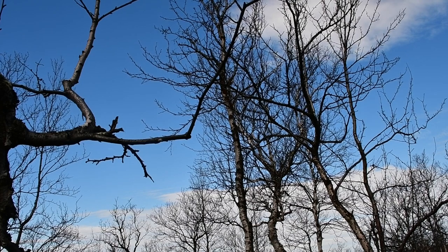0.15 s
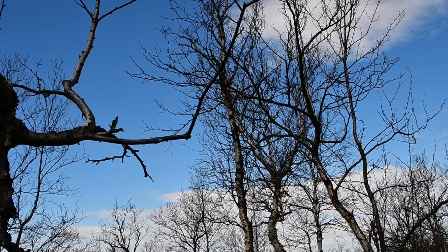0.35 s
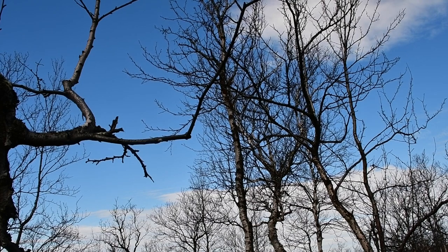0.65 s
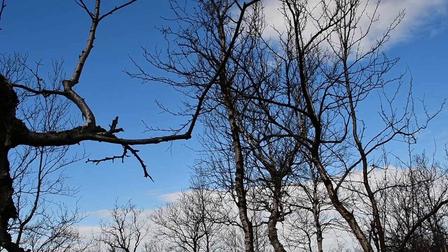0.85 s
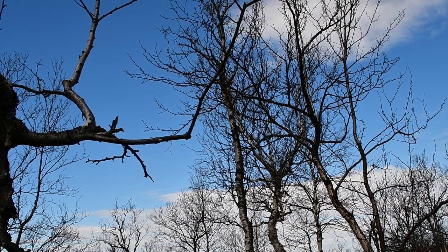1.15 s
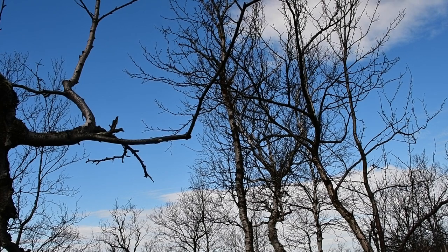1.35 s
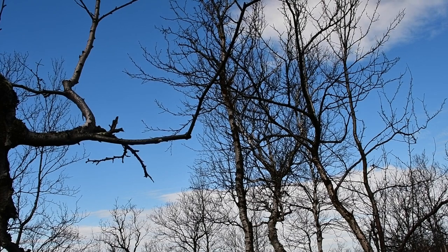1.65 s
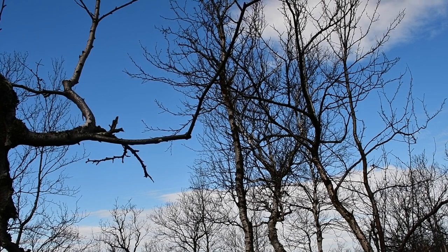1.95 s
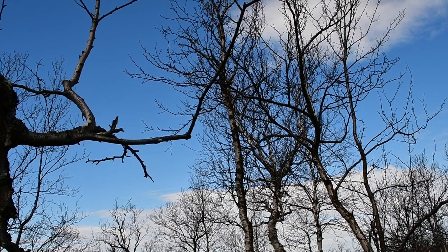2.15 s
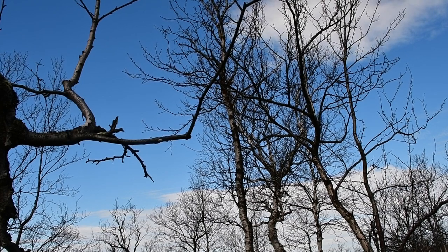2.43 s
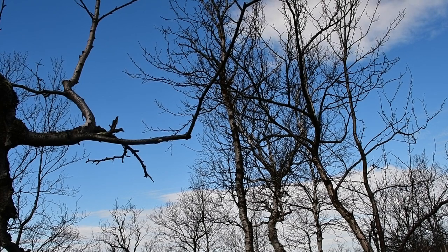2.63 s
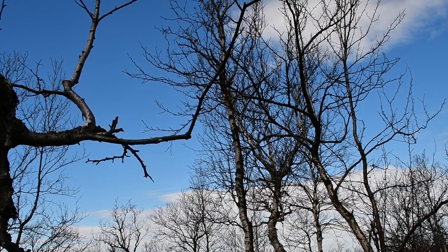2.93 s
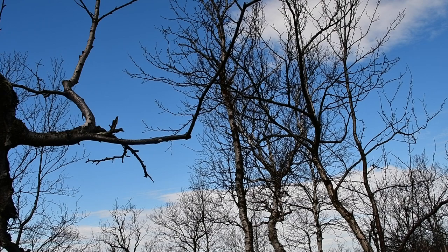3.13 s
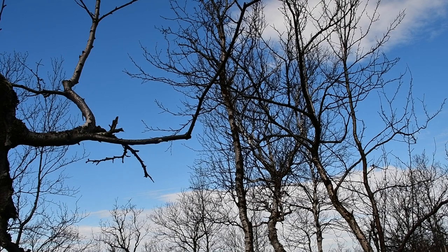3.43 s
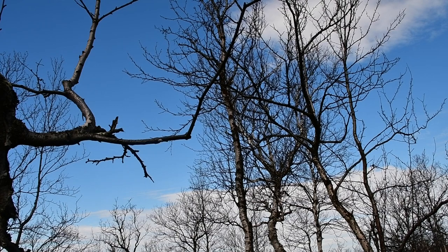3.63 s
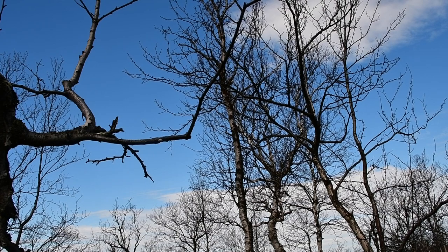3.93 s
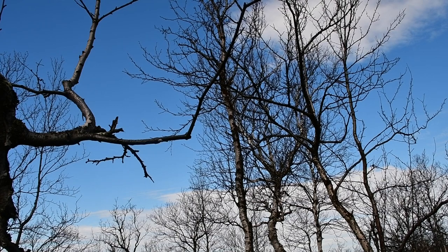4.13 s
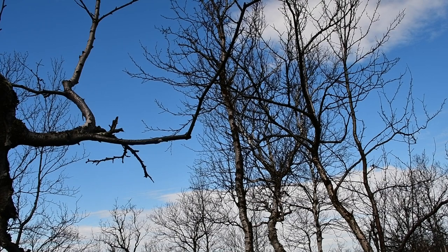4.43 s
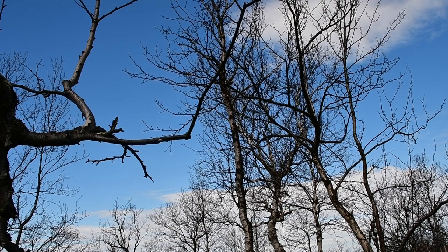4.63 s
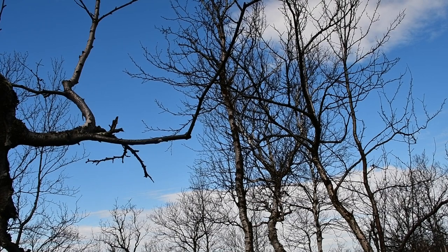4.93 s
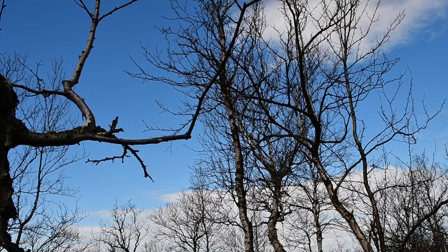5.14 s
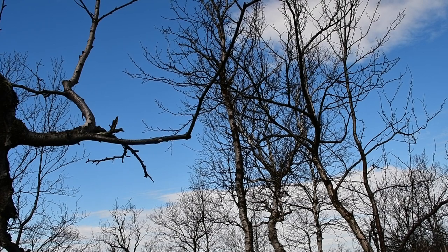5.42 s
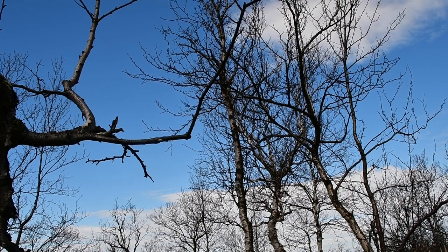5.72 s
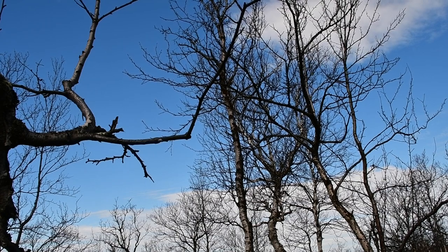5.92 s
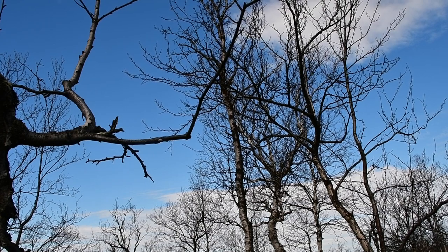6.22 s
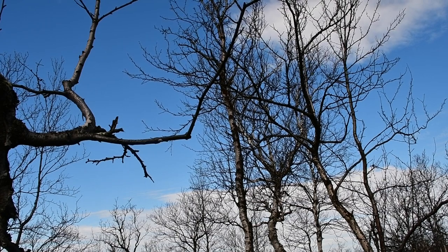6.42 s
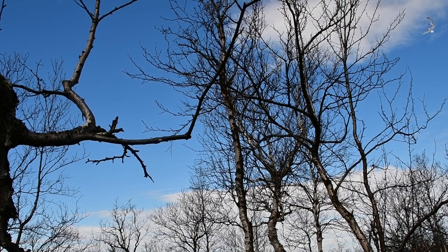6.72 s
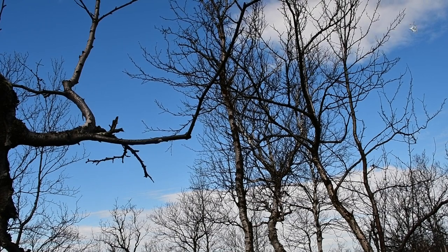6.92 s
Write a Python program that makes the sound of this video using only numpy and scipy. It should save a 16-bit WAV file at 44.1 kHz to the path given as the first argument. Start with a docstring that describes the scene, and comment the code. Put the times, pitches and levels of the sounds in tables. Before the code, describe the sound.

A quiet open-air stereo scene with air hiss, distant low engine hum and slight wind rumble at the microphone. Far gulls call singly, their falling cries scattered by trunks into a long thin tail. Songbirds whistle and slur throughout, with a few dry ticks. Later comes a buzzy mew, a run of chirps, and finally the strongest, closest gull cry with mewing answers, weighted right.

```python
"""Gulls call over the edge of a bare wood, on stereo with the right side louder, in air, engine hum and wind.
Three high cries come close together, then two more; each is a rough catch, a top pitch and a sag to a break.
Small birds whistle and slur throughout as thin bending notes; one starts a repeated phrase, dry ticks join in.
A long nasal mew follows, rich in partials, then twitter over gusts of low filtered noise.
A near cry overlaps a rising mew, and a softer mew ends; trunks scatter each call into a long noise tail."""
import sys
import numpy as np
from scipy import signal
from scipy.fft import rfft, irfft
from scipy.io import wavfile
from scipy.ndimage import map_coordinates

SR = 44100
rng = np.random.default_rng(int(sys.argv[2]) if len(sys.argv) > 2 else 0)


def transcribe(signal):
    """Save signal, clipped to [-1, 1], as a 16-bit WAV file at the path in sys.argv[1]."""
    frames = np.atleast_2d(signal).T
    limited = np.clip(frames, -1, 1)
    pcm = np.round(limited * 32767).astype(np.int16)
    wavfile.write(sys.argv[1], SR, pcm)


N = 311787
TIME = np.arange(N) / SR


def undb(db):
    """Decibels to gain."""
    return 10 ** (np.asarray(db) / 20)


def unit(x):
    """Scale to rms 1."""
    return x / np.sqrt(np.mean(x ** 2))


def at_hz(points, hz):
    """Read a (frequency_hz, value) table on a log-frequency axis."""
    f, value = np.transpose(points)
    return np.interp(np.log(np.maximum(hz, 1)), np.log(np.maximum(f, 1)), value)


def colour(x, points):
    """Filter a sound by a (frequency_hz, gain_db) table."""
    size = x.shape[-1]
    gain = undb(at_hz(points, np.fft.rfftfreq(size, 1 / SR)))
    return irfft(rfft(x) * gain, size)


def walk(rate_hz, size=N):
    """Smooth random curve through normal draws of spread 1, rate_hz of them a second."""
    knots = rng.standard_normal(int(size * rate_hz / SR) + 2)
    return map_coordinates(knots, [np.arange(size) * rate_hz / SR], order=3, mode="nearest")


def bump(t, centre_s, half_width_s):
    """Bell curve of height 1 around a moment."""
    return np.exp(-((t - centre_s) / half_width_s) ** 2)


def add(track, start_s, sound):
    """Mix a sound into a track at a time."""
    i = int(start_s * SR)
    track[i:i + len(sound)] += sound[:max(N - i, 0)]


def late(x, lag_s):
    """The same sound, arriving later."""
    return np.interp(TIME - lag_s, TIME, x)


# hiss spectrum, relative: [frequency_hz, density_db]
AIR_COLOUR = [(120, -7), (200, -2.5), (223, -5.5), (258, -8.5), (399, -8), (1150, -11.5), (1400, -12.5),
              (1540, -12), (3070, -13), (3820, -15.5), (4330, -17), (5200, -17), (7480, -24.5),
              (15500, -21.5)]
# likeness of left and right: [frequency_hz, correlation from -1 to 1]
AIR_LIKENESS = [(300, 1), (640, 0.83), (1400, -0.03), (3100, -0.29), (6800, 0.18), (9500, 1)]


def air(level_db=-40.5):
    """Even outdoor hiss, alike on both sides in the bass and the top, diffuse between."""
    likeness = np.clip(at_hz(AIR_LIKENESS, np.fft.rfftfreq(N, 1 / SR)), -1, 1)
    right, other = rfft(rng.standard_normal((2, N)))
    left = likeness * right + np.sqrt(1 - likeness ** 2) * other
    hiss = irfft(np.array([left, right]), N)
    return unit(colour(hiss, AIR_COLOUR)) * undb(level_db)


# partials of the hum: [multiple of the base pitch, relative level_db]
ENGINE_ORDERS = [(1, -7.5), (2, -1.5), (3, -11), (4, -17)]
# lulls in the hum: [centre_s, half_width_s, depth_db]
LULLS = [(2.1, 0.38, -2.5), (3.8, .35, -17), (5.15, .12, -31)]
ENGINE_HZ, ENGINE_DB = 64.33, -42
HUM_FADE_DB_PER_S = -0.07  # the engine slowly recedes


def engine(fading_db=1.5, drift=0.0027):
    """Low engine orders, each fading in and out on its long way through the air."""
    phase = 2 * np.pi * np.cumsum(ENGINE_HZ * (1 + drift * walk(2.8))) / SR
    hum = np.zeros(N)
    for order, db in ENGINE_ORDERS:
        gain = undb(db + fading_db * walk(3.7))
        hum += gain * np.sin(round(order) * phase + rng.uniform(0, 2 * np.pi))
    lull_db = sum(depth_db * bump(TIME, s, width_s) for s, width_s, depth_db in LULLS)
    recede_db = HUM_FADE_DB_PER_S * (TIME - TIME.mean())
    return np.sqrt(2) * hum * undb(ENGINE_DB + lull_db + recede_db)


# rumble spectrum, relative: [frequency_hz, gain_db]
WIND_COLOUR = [(15, -33), (30, -22), (45, -5.5), (70, 2), (100, -4.5), (150, -10.5), (220, -26.5),
               (400, -29), (900, -42)]
# gusts: [peak_s, half_width_s, level_db before gain_db]
GUSTS = [(.6, 0.35, -47), (2.6, 0.027, -42), (3.16, 0.018, -34.5), (3.97, 0.037, -37.5), (4.21, 0.066, -38),
         (5.48, 0.062, -32.5), (5.69, 0.05, -32.5), (5.91, 0.067, -33.5), (6.78, 0.15, -37.5)]
BREEZE_START_DB, FRESHEN_DB_PER_S = -47, 1.16  # the start level is before gain_db


def wind(gain_db=1):
    """Soft gusts over a slowly freshening breeze, as low noise rumbling at the microphone."""
    power = undb(BREEZE_START_DB + FRESHEN_DB_PER_S * TIME) ** 2
    for s, width_s, db in GUSTS:
        power = power + undb(db) ** 2 * bump(TIME, s, width_s)
    rumble = unit(colour(rng.standard_normal(N), WIND_COLOUR))
    return rumble * np.sqrt(power) * undb(gain_db)


# tone of the scatter: [frequency_hz, gain_db]
WOOD_COLOUR = [(300, -12), (1400, 3), (3000, 1), (5000, 2), (9000, 24)]


def wood(x, t60_s, near_db, near_s, build_s=0.0012):
    """Scatter from the trunks: a quick cluster from the nearest, then a long thin tail."""
    t = TIME[:2 * SR]
    tail = np.exp(-np.log(1000) * t / t60_s)
    cluster = undb(near_db) * np.exp(-t / near_s)
    shape = (1 - np.exp(-t / build_s)) * (tail + cluster)
    response = rng.standard_normal((2, len(t))) * shape / np.sqrt(np.sum(shape ** 2))
    return signal.fftconvolve(x[None], colour(response, WOOD_COLOUR), axes=1)[:, :N]


# left port's shading from a source on the right, before its shade_db: [frequency_hz, gain_db]
PORT_SHADE = [(300, 1), (650, -4.5), (2200, -4.5), (3300, -7), (5000, -3), (9000, -20)]
PORT_LAG_S = 0.00016


def from_right(x, shade_db):
    """A source on the right reaches the left port later and shaded."""
    left = undb(shade_db) * colour(late(x, PORT_LAG_S), PORT_SHADE)
    return np.array([left, x])


# dry ticks and rustles close by: [start_s, decay_s, level_db before gain_db]
TICKS = [(3.2941, 0.00057, -15.5), (3.296, 0.024, -38), (3.317, 0.0066, -35.5), (4.723, 0.008, -37.5),
         (6.005, 0.025, -28), (6.04, 0.0073, -33), (6.849, .001, -30)]
# their tone: [frequency_hz, gain_db]
TICK_COLOUR = [(250, -3), (1000, -8), (2500, -4.5), (3600, 1), (5300, -1.5), (6800, -9), (8800, -4.5),
               (10500, -24), (15000, -32)]


def ticks(gain_db=7.5):
    """Short dry noise bursts; the longer ones are rustles that swell before they die away."""
    track, t = np.zeros(N), TIME[:SR // 10]
    for s, decay_s, db in TICKS:
        shape = 2 * (1 - np.exp(-2 * t / decay_s)) * np.exp(-t / decay_s)
        add(track, s, undb(db + gain_db) * shape * rng.standard_normal(len(t)))
    return colour(track, TICK_COLOUR)


def note(length_s, pitches_hz, db, buzz=0.018):
    """A thin sine note that bends smoothly through two or three pitches; buzz jitters the pitch."""
    u = np.linspace(0, 1, max(int(length_s * SR), 2))
    bend = np.polyfit(np.linspace(0, 1, len(pitches_hz)), pitches_hz, len(pitches_hz) - 1)
    hz = np.polyval(bend, u) * (1 + buzz * walk(584, len(u)))
    swell = np.sqrt(2 * np.abs(np.sin(np.pi * u)))
    return undb(db) * swell * np.sin(2 * np.pi * np.cumsum(hz) / SR)


# All songbird levels are before the gain_db of the whole group.
# one phrase: [after_main_note_s, length_s, start_hz, middle_hz, end_hz, level_db re phrase]
PHRASE = [(-.155, 0.0417, 3766, 3940, 3950, -12), (0, 0.0514, 3550, 3900, 3935, -7),
          (0.085, .054, 3250, 3460, 3380, -4), (0.158, .06, 3800, 3760, 3466, -1.5)]
# its repeats: [main_note_s, level_db]
PHRASES = [(2.52, -28.5), (3.067, -34), (3.608, -35.5), (4.139, -35), (4.663, -27)]
# thin slurs about once a second: [start_s, length_s, level_db]
SLURS = [(.152, 0.029, -44), (1.158, 0.062, -48), (2.124, 0.11, -46.5), (3.182, 0.085, -45.5)]
# every slur's path: [start_hz, middle_hz, end_hz]
SLUR_HZ = (5880, 4930, 5250)
# twitter: [start_s, hold_s, mid_hold_pitch_hz, hold_level_db, flick_level_db]
CHIPS = [(5.19, 0.02, 4950, -31, -33.5), (5.304, 0.021, 4980, -29, -30), (5.394, .02, 5050, -34.5, -30.5),
         (5.445, 0.026, 5540, -37.5, -32.5), (5.516, .008, 5200, -33.5, -37),
         (5.645, 0.01, 4980, -30.5, -32.5), (5.758, 0.033, 4880, -35, -33),
         (5.85, 0.02, 5130, -32.5, -33.5), (5.909, 0.018, 5270, -29, -33), (5.963, 0.014, 5470, -31, -31.5)]
# every flick's path: [start_hz, end_hz]
FLICK_HZ = (5130, 3640)
FLICK_S = 0.016
# stray whistles: [start_s, length_s, start_hz, middle_hz, end_hz, level_db, buzz as share of pitch]
WHISTLES = [(0.615, .08, 3550, 4310, 3430, -36, 0.0061), (0.633, 0.054, 4950, 5250, 5090, -41, 0.013),
            (1.333, 0.22, 3700, 3950, 4090, -43.5, 0.028), (1.345, .18, 2960, 3150, 3070, -47, .015),
            (2.057, 0.1, 3870, 3980, 3930, -46.5, 0.023), (5.045, 0.025, 4075, 3700, 2900, -26, 0.098),
            (6.114, .04, 3690, 3300, 2890, -32, 0.053), (6.233, 0.0376, 3200, 3620, 3930, -34, 0.045),
            (6.362, 0.039, 3680, 3074, 2730, -34.5, 0.026),
            (6.986, 0.0196, 6170, 5870, 5470, -44.5, 0.0066), (7.007, 0.031, 5060, 4500, 4050, -40, 0.046),
            (7.022, 0.055, 5450, 5590, 5920, -37.5, 0.0086)]


def songbirds(gain_db=-0.5, droop=0.033):
    """One bird repeats a phrase, one slurs high, one twitters; others whistle now and then."""
    track = np.zeros(N)
    for s, db in PHRASES:
        for after_s, length_s, *pitches_hz, accent_db in PHRASE:
            add(track, s + after_s, note(length_s, pitches_hz, db + accent_db, buzz=.004))
    for s, length_s, db in SLURS:
        add(track, s, note(length_s, SLUR_HZ, db, buzz=0.044))
    for s, hold_s, hz, db, flick_db in CHIPS:
        # each chip droops slightly over its hold, then flicks down
        add(track, s, note(hold_s, [hz * (1 + droop), hz * (1 - droop)], db))
        add(track, s + hold_s, note(FLICK_S, FLICK_HZ, flick_db, buzz=.025))
    for s, length_s, *pitches_hz, db, buzz in WHISTLES:
        add(track, s, note(length_s, pitches_hz, db, buzz))
    return track * undb(gain_db)


def controls(table, fade_s=.007):
    """Times of a gull call, its soft-edged gate and its columns, sample by sample."""
    s, *columns = np.transpose(table)
    t = np.arange(s[0] - fade_s, s[-1] + fade_s, 1 / SR)
    gate = np.clip(np.minimum(t - t[0], t[-1] - t) / fade_s, 0, 1)
    return t, gate, [np.interp(t, s, c) for c in columns]


def syrinx(hz, rough, jitter, doubling, shimmer=0.44, waver=0.0027):
    """Phase and strength of the vibration; when rough, cycles scatter and alternate strong and weak."""
    size = len(hz)
    rough = np.clip(rough, 0, 1)
    scatter = jitter * rough ** 2 * walk(900, size)
    pitch = hz * (1 + waver * walk(139.6, size) + scatter)
    phase = 2 * np.pi * np.cumsum(pitch) / SR
    strength = 1 + rough * (doubling * np.cos(phase / 2) + shimmer * walk(700, size))
    return phase, strength


# throat resonance and nasal edge of the mews: [frequency_hz, gain_db]
MEW_BODY = [(300, -11.5), (450, -17.5), (680, 3.5), (950, 5.5), (1250, -7.5), (1800, -6.5), (2250, -11.5),
            (2800, -26), (4000, -36), (7000, -52)]
MEW_EDGE = [(1500, -21), (2700, -41), (3300, 4.5), (4600, -6.5), (5300, -8), (6200, -21), (7200, -31),
            (12000, -52)]
MEW_CREAK_S = 0.032  # the voice breaks up at the end


def mew(course, gain_db, open_db, nasal_db, fade_db, catch_s, hoarse):
    """A low mew, rough at both ends: the throat rings on the second partial, a nasal edge rides above."""
    t, gate, (hz, db) = controls(course)
    age = t - t[0]
    edge_db = nasal_db - fade_db * age
    rough = hoarse + np.exp(-(age / catch_s) ** 4) + bump(t, t[-1], MEW_CREAK_S)
    phase, strength = syrinx(hz, rough, jitter=0.087, doubling=0.11, waver=0.0049)
    voice = np.zeros(len(t))
    for k in range(1, 24):
        # the bill's opening sets the partials above the second
        body = undb(at_hz(MEW_BODY, k * hz) + open_db * (k > 2))
        edge = undb(edge_db + at_hz(MEW_EDGE, k * hz))
        # all partials but the second swell and fade on their own
        flutter = undb(3.5 * (k != 2) * walk(20, len(t)))
        voice += (body + edge) * flutter * np.sin(k * phase + rng.uniform(0, 2 * np.pi))
    track = np.zeros(N)
    add(track, t[0], np.sqrt(2) * voice * strength * gate * undb(db + gain_db))
    return track


# course of each mew: [time_s, pitch_hz, level_db before the voice's gain_db]
MEW_LONG = [(4.948, 447.0, -37.5), (4.966, 411, -36), (4.976, 459.5, -22), (4.984, 470.2, -32),
            (5.03, 460.7, -20), (5.08, 438.6, -23), (5.112, 439, -21), (5.188, 401, -25),
            (5.228, 358.6, -36.5), (5.276, 392.6, -25.5), (5.308, 342, -39), (5.322, 353, -34.5)]
MEW_RISING = [(6.55, 388, -35), (6.576, 342, -34.5), (6.61, 376, -27.5), (6.664, 404, -24.5),
              (6.706, 391, -23.5), (6.75, 432, -31), (6.76, 460, -29)]
MEW_SOFT = [(6.8, 362.3, -31), (6.848, 326, -33), (6.878, 328.4, -36), (6.91, 377, -31.5),
            (6.94, 358, -34.5), (6.956, 325, -33), (6.985, 276, -46)]
# voice of each: [gain_db, open_bill_db, nasal_edge_db, edge_fade_db_per_s, rough_start_s, hoarseness 0-1]
MEW_VOICES = [(0, -2, -8, 47, 0.0333, 0.06), (-0.5, -4.5, -9, 31, 0.049, 0.02),
              (-2, -8, -10, 18, 0.0095, 0.21)]


def mews():
    """Three low mews in turn: a long one, a rising one and a soft one."""
    courses = (MEW_LONG, MEW_RISING, MEW_SOFT)
    return sum(mew(course, *voice) for course, voice in zip(courses, MEW_VOICES))


# roll-off of the cries' upper partials, read relative to the third: [frequency_hz, gain_db]
CRY_TOP = [(2500, 34.5), (4000, 15.5), (5000, 2), (5800, -2.5), (6700, -17.5), (7600, -17), (9000, -49),
           (13000, -36)]
# effort through every cry: [stage, level_db, overtones_db, roughness 0-1]
# stage: 0 start, 1 top, 2 end of hold, 3 knee, 4 end
CRY_EFFORT = [(0, -12, -8, 0.83), (.3, -1.5, -2.5, 0.76), (.55, -0.5, 2, 0.39), (.72, -15, -8.5, 0.7),
              (.9, -3, -18, 0.55), (1, 1.5, -0.5, 0.017), (1.4, -5, -7, 0.13), (2.1, -1, 3, 0.006),
              (2.45, -0.5, 5.5, 0), (2.9, -2, 1.5, 0), (3.4, -0.5, -5, 0.0088), (3.7, -5.5, -12.5, .2),
              (4, -8.5, -9, .5)]
# throat gain on the second and third partials: [frequency over the resonance, gain_db]
CRY_THROAT = [(.6, -7.5), (.79, -16), (.87, -7.5), (1, 0.5), (1.2, -19.5), (1.36, -10), (1.5, -13.5)]
# the voice slips, then drops into its low register: [stage, share of the way from knee to end pitch]
CRY_BREAK = [(3, 0), (3.4, .36), (3.6, .78), (4, 0.99)]
CRY_REST_HZ = 981.3  # pitch as the voice catches
ACCENT_S = 0.04  # half width of the push at the end of the hold, which shifts level and overtones


def cry(catch_s, hold_s, sag_s, break_s, top_hz, knee_hz, end_hz, rising, rise_bend, sag_bend,
        level_db, swell_db, catch_db, accent_db, break_db, bright_db, break_bright_db, throat_hz, hoarse):
    """A high cry: a fundamental, two partials shaped by the throat, and higher ones that it rolls off."""
    corners = np.cumsum(np.maximum([0, catch_s, hold_s, sag_s, break_s], 0))
    t, gate, (stage,) = controls(list(zip(corners, range(len(corners)))))

    rise = np.clip(stage / rising, 0, 1) ** rise_bend
    sag = 1 - (1 - np.clip(stage - 2, 0, 1)) ** sag_bend
    fall = np.interp(stage, *np.transpose(CRY_BREAK))
    hz = CRY_REST_HZ + (top_hz - CRY_REST_HZ) * rise
    hz = hz + (knee_hz - top_hz) * sag + (end_hz - knee_hz) * fall

    steps, *effort = np.transpose(CRY_EFFORT)
    db, open_db, rough = (np.interp(stage, steps, column) for column in effort)
    catching = np.clip(2 * (1 - stage), 0, 1)
    breaking = np.minimum(2 * fall, 1)
    push_db = accent_db * bump(t, catch_s + hold_s, ACCENT_S)
    db = db + level_db + swell_db * (t - t.mean())
    db = db + catch_db * catching + push_db + break_db * breaking
    open_db = open_db + bright_db + push_db + break_bright_db * breaking

    def throat_db(k):
        """Level of a low partial as it sweeps past the throat resonance, with a random flutter."""
        return open_db + np.interp(k * hz / throat_hz, *np.transpose(CRY_THROAT)) + walk(34, len(t))

    second_db, third_db = throat_db(2), throat_db(3)
    phase, strength = syrinx(hz, rough + hoarse, jitter=0.0904, doubling=0.33)
    voice = np.sin(phase) + undb(second_db) * np.sin(2 * phase)
    for k in range(3, 8):
        rolloff_db = at_hz(CRY_TOP, k * hz) - at_hz(CRY_TOP, 3 * hz)
        voice += undb(third_db + rolloff_db) * np.sin(k * phase)
    return np.sqrt(2) * voice * strength * gate * undb(db)


# the cries; dB columns add to the shared effort:
# [start_s, catch_s, hold_s, sag_s, break_s, top_hz, knee_hz, end_hz, share of the catch spent rising,
#  bend of the rise, bend of the sag (1 straight), level_db, swell_db_per_s, catch_db, accent_db, break_db,
#  overtones_db, break_overtones_db, throat_hz, hoarseness 0-1, nearness 0-1]
CRIES = [(0.188, 0.042, 0.0066, 0.036, .012, 1308, 1210, 1220, 0.87, 2.3, 1.4, -35, 35, 2, -4.5, 4, -19, 0, 3250, 0.46, 0),
         (0.283, 0.0096, 0.051, 0.028, 0.033, 1398, 1370, 1010, 1, 1.3, 1, -38, 118, -8, 6, -0.5, -22, 0, 3340, 0.47, 0),
         (0.407, 0.047, 0.031, 0.16, 0.11, 1754, 1529, 925, 1, 0.94, .85, -26.5, 27, 2, -0.5, 0.5, -3, 2.5, 3470, .1, 0),
         (1.495, 0.037, 0.048, 0.19, 0.069, 1628, 1325, 940, 0.98, 1.2, 1.64, -23, -5, -6.5, -2, -2, -1, -16, 3390, 0.01, 0),
         (2.449, .056, 0.00564, .145, .045, 1384, 1292, 945, 0.96, 4.5, 1.3, -25.5, 4, 1.5, -1.5, -10, 0.5, 11, 2717, 0.29, 0),
         (6.424, .056, .043, .203, .045, 1675, 1270, 960, .53, 2, 1.23, -16, 7, -0.5, 3.5, -4, 1, 6.5, 3425, 0.0067, 1)]


def cries(lead_s=0.0064):
    """The high cries, sorted into far and near gulls; each soft edge leads its start."""
    far, near = np.zeros((2, N))
    for s, *shape, nearness in CRIES:
        add(near if nearness > .5 else far, s - lead_s, cry(*shape))
    return far, near


def scene():
    """Far gulls and the songbirds among the twigs sound wetter than the near gulls."""
    birds, tick = songbirds(), ticks()
    far, near_cry = cries()
    near = near_cry + mews()
    # an echo beats against the falling pitch and makes the far cries flutter
    echoed = far + undb(-21) * late(far, lag_s=.034)
    direct = from_right(echoed, shade_db=2.5) + from_right(near, shade_db=-0.5)
    direct = direct + from_right(birds, shade_db=1.5)
    gull_scatter = wood(undb(-6.5) * far + undb(-13) * near, t60_s=1.01, near_db=15.5, near_s=0.0067)
    bird_scatter = wood(undb(-4.5) * birds, t60_s=1.0, near_db=12, near_s=0.016)
    # the ticks reach the left port first
    close = np.array([undb(3) * tick, late(tick, PORT_LAG_S)])
    return air() + engine() + wind() + close + direct + gull_scatter + bird_scatter


TOP_HZ = 15800


def record(dry, left_db=-6):
    """The left channel is weaker; the top is cut steeply."""
    sound = dry * undb([[left_db], [0]])
    steep_cut = signal.ellip(10, .1, 80, TOP_HZ, fs=SR, output="sos")
    return signal.sosfilt(steep_cut, sound)


dry = scene()
out = record(dry)
transcribe(out)
```